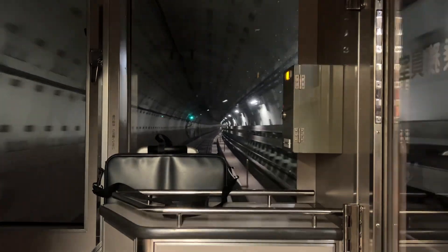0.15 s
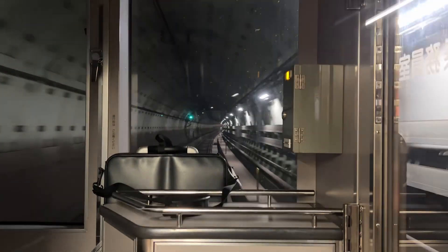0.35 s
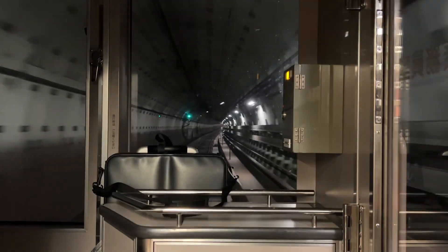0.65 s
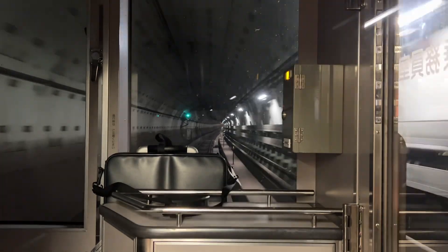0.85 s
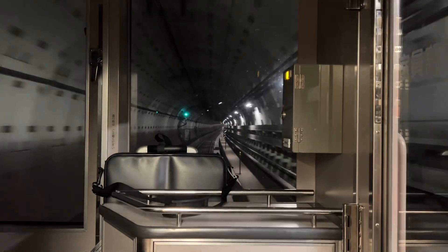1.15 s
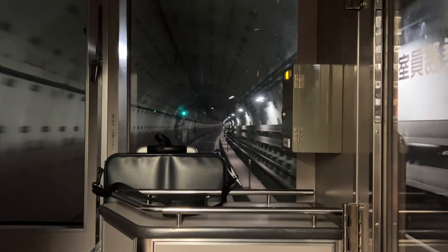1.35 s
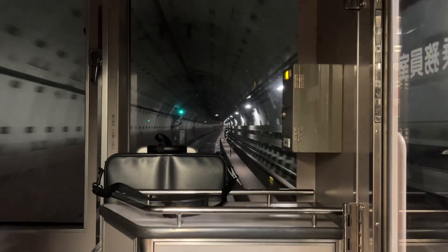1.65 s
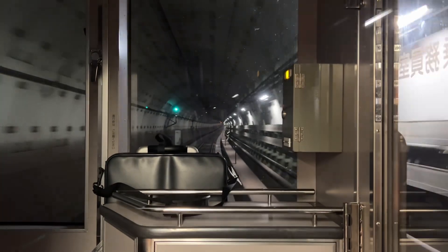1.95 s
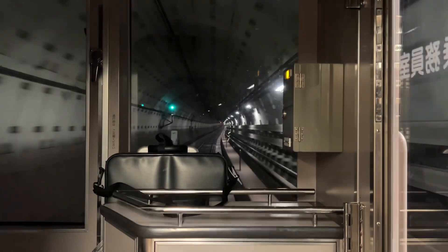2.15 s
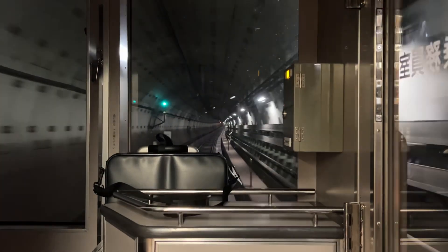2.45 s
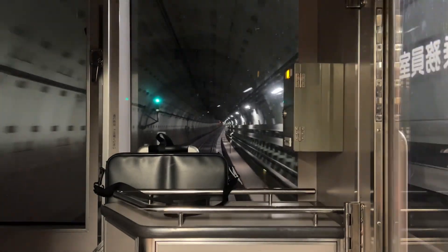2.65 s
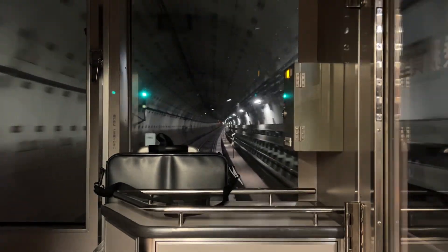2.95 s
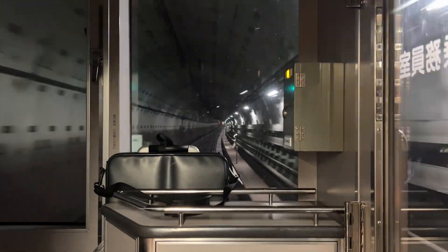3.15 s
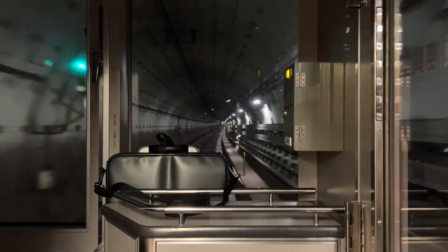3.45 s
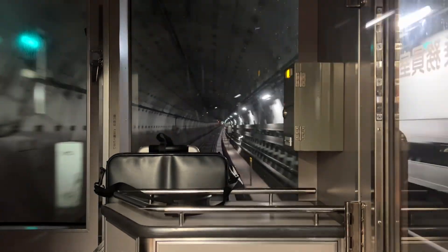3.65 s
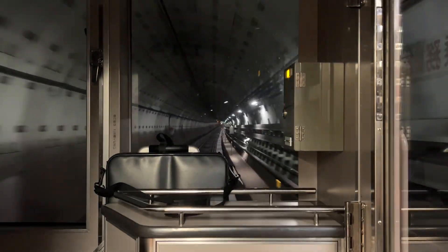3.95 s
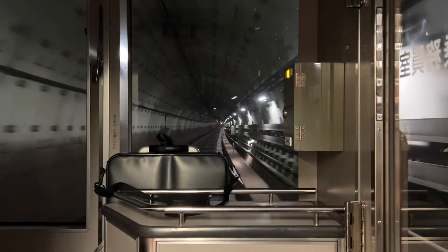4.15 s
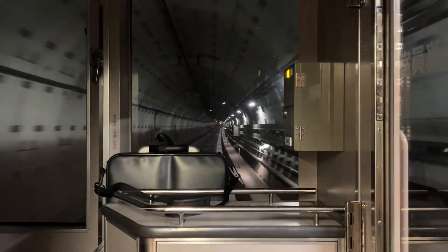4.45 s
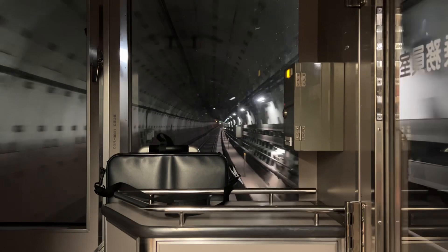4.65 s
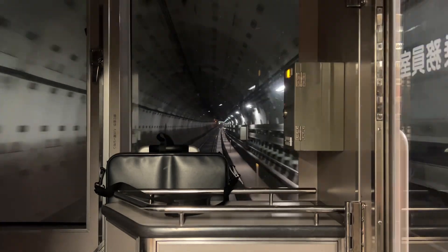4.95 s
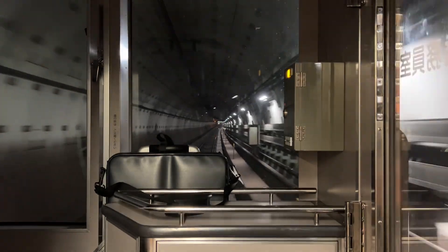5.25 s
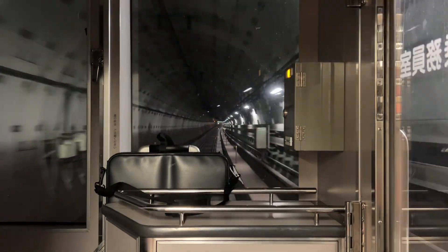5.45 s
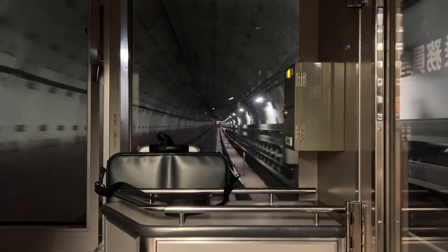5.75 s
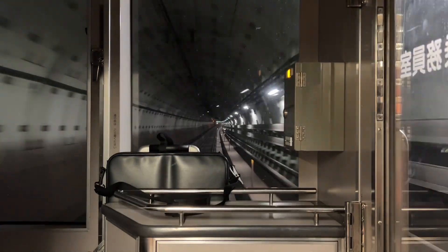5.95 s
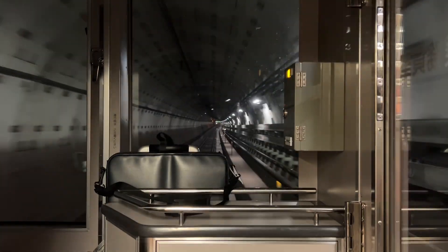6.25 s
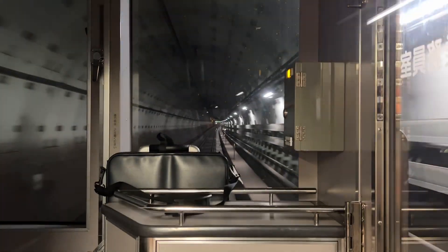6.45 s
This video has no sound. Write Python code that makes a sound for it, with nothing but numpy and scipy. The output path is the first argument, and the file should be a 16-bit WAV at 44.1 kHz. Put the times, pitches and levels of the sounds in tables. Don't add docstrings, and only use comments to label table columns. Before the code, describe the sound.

Inside the front car of an electric train moving through a tunnel, heard in stereo on a phone close to the cab partition. From 0 s there is a deep, wavering rumble, a dull wheel hum and a thin hiss of rushing air. Loose metal door fittings buzz and knock immediately, busiest until about 1.5 s, with sharp dry ticks near 0.85 and 1.37 s. The rattle then thins while the rumble surges briefly around 2.4 s. From about 2.8 s rough rail drives harder, fuller booms, with ticks near 3.3 and 3.6 s. Just after 4 s the wheels strike a rail gap, a hard clank and a second blow ringing in the steel; softer blows come around 5 to 5.1 s. Bright buzzing and knocks return strongly from 5.2 s, including a sharper knock near 5.75 s, and continue over heavy rolling until the end at about 6.6 s.

```python
import sys
import numpy as np
from scipy import signal
from scipy.fft import rfft, irfft, next_fast_len
from scipy.io import wavfile
from scipy.ndimage import uniform_filter1d, map_coordinates

SR = 44100
rng = np.random.default_rng(int(sys.argv[2]) if len(sys.argv) > 2 else 0)


def boost(x):
    u = np.asarray(x, float) / 20
    return 10 ** u


def to_wav(sig):
    pcm = np.clip(np.atleast_2d(sig), -1, 1) * 32767
    pcm = np.round(pcm).astype(np.int16)
    wavfile.write(sys.argv[1], SR, pcm.T)


N = 291501

# (frequency [Hz], level [dB])
SHAKE_TONE = [(15, -46.5), (25, -17), (40, -15), (60, -7.5), (75, -1.5), (105, -8.5), (135, -7.5),
              (200, -3.5), (400, -76)]
# (frequency [Hz], level over the shake [dB])
SPRING_HUMS = [(50, -7), (73, -3), (101, -1)]
# (start [s], length [s], boom [dB], floor over boom [dB], panels over boom [dB])
RAIL_RIPPLES = [(0.136, 0.36, -29.5, -19, -16), (0.793, 0.033, -32, -22, -18), (1.275, 0.36, -31.5, 1, -18),
                (1.625, 0.19, -25.5, -0.5, -15.5), (1.768, 0.16, -26.5, 2.5, -24),
                (1.97, .2, -30.5, -5, -23), (2.24, 0.18, -33, 1.5, -16), (2.393, 0.31, -20, -6.5, -27),
                (2.796, 0.19, -25, 0.5, -5.5), (2.95, 0.16, -18, -1, -9), (3.12, 0.48, -30, 3.5, -10),
                (3.668, 0.18, -18.5, -0.5, -10), (3.868, 0.064, -18, 1, -9.5),
                (4.062, 0.068, -14, -11, -11.5), (4.15, 0.17, -16, -6.5, -10),
                (4.35, 0.036, -21.5, -7.5, -22), (4.45, 0.63, -22, -2.5, -12),
                (4.897, 0.11, -13.5, -3.5, -10), (5.016, 0.18, -15, -1.5, -8), (5.288, 0.19, -19.5, -6, -7),
                (5.51, 0.3, -20, -7.5, -9.5), (5.761, 0.3, -16, -6.5, -11), (6.124, 0.19, -16, -6, -16.5),
                (6.395, 0.15, -20, -8, -11)]
# (frequency [Hz], width [Hz], level [dB])
BODY_MODES = [(158.6, 55, -5.5), (204.9, 33.4, 1), (236.7, 12.8, 3)]
# (frequency [Hz], width [Hz], level [dB])
FLOOR_MODES = [(281.4, 50, -0.5), (331, 44, -4), (365, 57, -8)]
# (frequency [Hz], width [Hz], level [dB])
PANEL_MODES = [(453, 126, 1.5), (552, 48, -2), (608, 70, -2), (694, 104, 0)]
# (frequency [Hz], width [Hz], level [dB])
WHEEL_MODES = [(862, 163, 5), (1020, 360, 1), (1365, 315, 1), (1900, 480, -2.5), (2390, 870, -7.5),
               (3010, 540, -13.5)]
# (time [s], level [dB])
WHEEL_SONG = [(0, -35.5), (2.5, -37.5), (6.61, -37.5)]
# (time [s], level [dB], time to fade by 60 dB [s])
RAIL_GAPS = [
    (4.068, -16.5, 0.93),
    (4.092, -32, 0.37),
    (4.2, -23, 1),
    (4.233, -35.5, 0.17),
    (4.932, -42.5, 0.82),
    (4.99, -31.5, 0.99),
    (5.101, -26.5, 0.56),
]
# (frequency [Hz], width [Hz], level [dB])
WHEEL_RING_MODES = [(775, 56, 8), (913, 190, 1), (1350, 110, 0), (1940, 200, -3), (2370, 340, -16),
                    (2860, 430, -16.5), (3830, 250, -24.5), (5530, 860, -31)]
# (frequency [Hz], level [dB])
AIR_TONE = [(2000, -29), (3300, 4.5), (4500, 1), (7000, -6), (10000, -50), (15300, -18.5), (15900, -32.5)]
# (start [s], length [s], level [dB], top end [dB])
BUZZ_SPELLS = [(0.027, 0.2, -47.5, -4), (0.326, 0.066, -50, -3), (0.459, 0.1, -45.5, -5.5),
               (0.613, .05, -52, -2), (0.83, 0.053, -53.5, -3), (0.951, .08, -52, -3),
               (1.116, 0.037, -54, -10), (1.22, 0.13, -55, -4), (1.505, 0.4, -66, -5),
               (1.835, .32, -55, -4.5), (2.213, 0.4, -52.5, -13), (2.826, 0.32, -50.5, -6.5),
               (3.12, 0.34, -48, -5.5), (3.563, 0.22, -58.5, -2), (3.779, .24, -48.5, -7),
               (4.047, 0.16, -53, -15), (4.627, 0.62, -47, -8), (5.153, 0.088, -48.5, 1),
               (5.28, 0.066, -46.5, -2.5), (5.387, 0.18, -44.5, -1), (5.542, 0.19, -43.5, -4),
               (5.86, 0.15, -52, -9), (6.002, 0.087, -48.5, -5), (6.11, 0.25, -48, -1.5),
               (6.401, 0.13, -47.5, -3.5)]
# (time [s], peak [dB], top end [dB])
KNOCKS = [(0.037, -36, -15), (0.0894, -29.5, -11), (0.149, -22, -11), (0.2423, -35, -4),
          (0.3202, -31.5, -8), (0.341, -28.5, -6), (0.411, -31, -5.5), (0.4654, -33, -4),
          (0.5045, -32.5, -9), (0.6394, -45, 4), (0.7787, -40, 0), (0.8436, -37, -12), (0.986, -35.5, -8.5),
          (1.1358, -33.5, -21), (1.2304, -37, -9), (1.259, -21, -13), (1.29, -42, -9), (1.3774, -35, -4),
          (2.944, -32.5, -4), (3.0437, -33.5, -5), (4.6628, -51, -9), (5.1704, -32.5, -3),
          (5.2994, -36.5, -4), (5.4476, -52, -1.5), (5.6, -43.5, -12), (5.7424, -26.5, -8.5),
          (6.0038, -35, -4), (6.1404, -37, -3), (6.4098, -31, -2.5), (6.4694, -34.5, -5)]
# (frequency [Hz], width [Hz], level [dB])
METAL_MODES = [(4330, 760, 2.5), (5570, 420, 2), (6640, 640, 1), (8240, 1100, -1.5), (9500, 2100, -17)]
# (frequency [Hz], level [dB])
SIZZLE_TONE = [(7000, -59.5), (9500, -22), (11000, -4.5), (12300, 0.5), (13500, -12), (14600, -1),
               (15300, -11.5), (15700, -38.5)]
# (time [s], peak [dB], centre [Hz], time to fade by 60 dB [s], thump [dB])
DRY_TICKS = [(0.5067, -39.5, 11950, 0.0023, -6), (0.846, -26.5, 7230, 0.0025, -7),
             (0.846, -36, 12450, 0.0018, -20), (0.846, -30, 4300, .003, -20),
             (1.3705, -29, 4500, .003, -25), (1.37, -23.5, 7570, 0.0018, -8), (1.37, -28, 13100, .002, -11),
             (1.3713, -25, 2480, 0.01, 9), (3.285, -19.5, 2670, 0.0056, 0.5),
             (3.2847, -35, 4250, 0.0034, -20), (3.612, -39, 9100, .002, 9), (5.867, -27, 1530, 0.0082, 8)]
# (frequency [Hz], level [dB])
CASE_SHADE = [(2600, -0.5), (3150, -3.5), (3600, -3.5), (4300, -4), (5200, -0.5)]
# (frequency [Hz], likeness [0-1])
PORT_LIKENESS = [(60, .995), (170, .93), (260, .78), (350, .55), (550, .5), (800, .12), (1700, .12),
                 (2100, .93), (2600, .92), (3700, .25), (4500, .6), (5200, .5), (6300, .85), (9000, .9),
                 (11500, .9), (16000, .82)]
# (frequency [Hz], phase [radians])
PORT_LEAD = [(100, 0), (450, -.5), (700, 0), (1900, .2), (2500, .3), (3700, 1.2), (5000, .2), (5700, -.5),
             (6500, 0), (8000, -.8), (10050, -3.14), (13300, -6.28), (16000, -8.2)]
# (frequency [Hz], level difference [dB])
PORT_LEAN = [(100, 0), (330, -1.5), (520, 4.5), (700, -3.5), (950, 0), (1350, -2.5), (2300, 2), (3500, 2),
             (4800, 4), (6300, 0.5)]

LONG_RISE = 0.12
SWAY_DB, SWAY_UNDER_BOOM_DB = -29, -20
RIPPLE_RISE_S, RIPPLE_T60_S = 0.029, 1
SMOOTH_BOOM_DB, SMOOTH_FLOOR_DB, SMOOTH_DRUM_DB = -31.5, -35, -33.5
SING_UNDER_DRUM_DB, SING_GROWS, HARD_DRUM_DB = -9.5, 1.75, -21.5
BUZZ_RISE_S, BUZZ_T60_S, IDLE_DB, IDLE_TOP_DB = 0.018, 0.58, -61, -6
KNOCK_T60_S, KNOCK_LONGER = 0.13, 0.0044


def unit(x):
    return x / np.sqrt(np.mean(x ** 2) + 1e-20)


def along(points, hz):
    f, v = np.transpose(points)
    return np.interp(np.log(hz + 1), np.log(f + 1), v)


def curves(rows):
    s, *cols = np.transpose(rows)
    return [np.interp(np.arange(N) / SR, s, c) for c in cols]


def filtered(x, response):
    m = next_fast_len(N + 8192)
    spectrum = rfft(x, m) * response(np.fft.rfftfreq(m, 1 / SR))
    return irfft(spectrum, m)[..., :N]


def modes(rows, steep):
    def response(f):
        power = 0
        for centre, width, db in rows:
            across = (f * width) ** 2
            power = power + boost(2 * db) * (across / ((centre * centre - f * f) ** 2 + across)) ** steep
        return np.sqrt(power)
    return response


def colour(points):
    return lambda hz: boost(along(points, hz))


def shaking(response, patchy_db=None):
    noise = rng.standard_normal((2, N))
    if patchy_db:
        z = signal.stft(noise, nperseg=512)[2]
        field = uniform_filter1d(rng.standard_normal(z.shape[1:]), size=5, axis=0)
        field = uniform_filter1d(field, size=10, axis=1)
        noise = signal.istft(z * boost(patchy_db * unit(field)), nperseg=512)[1][:, :N]
    return unit(filtered(noise, response))


def spells(starts, lengths, levels_db, rest_db, rise_s, t60):
    t = np.arange(0, N + 64, 64) / SR
    power = boost(2 * rest_db) + 0 * t
    for s, length, db in zip(starts, lengths, levels_db):
        rise = np.clip((t - s) / (rise_s + LONG_RISE * length), 0, 1)
        fade_db = 60 * np.clip(t - s - length, 0, None) / t60
        power += boost(2 * (db - fade_db)) * rise ** 2
    return np.interp(np.arange(N) / SR, t, 10 * np.log10(power))


def bursts(times, levels_db, decays, rise):
    out, t = np.zeros(N + SR), np.arange(SR // 2) / SR
    for s, db, t60 in zip(times, levels_db, decays):
        out[round(s * SR):][:len(t)] += boost(db - 60 * t / max(t60, .01)) * (1 - np.exp(-t / rise))
    return out[:N]


def rolling(over_db, rest_db):
    s, length, db = np.transpose(RAIL_RIPPLES)[:3]
    return spells(s, length, db + over_db, rest_db, RIPPLE_RISE_S, RIPPLE_T60_S)


def bogie():
    hums = 0
    for hz, db in SPRING_HUMS:
        wander = map_coordinates(rng.standard_normal(200), [np.arange(N) * 14 / SR])
        hums = hums + boost(db) * np.sin(2 * np.pi * np.cumsum(hz * (1 + .09 * wander)) / SR)
    shake = shaking(colour(SHAKE_TONE)) * boost(1.5)
    return boost(rolling(SWAY_UNDER_BOOM_DB, SWAY_DB) + 1.0) * (shake + [hums, 0 * hums])


def wheels():
    *_, floor_over_db, drum_over_db = np.transpose(RAIL_RIPPLES)
    boom_db = rolling(0, SMOOTH_BOOM_DB)
    floor_db = rolling(floor_over_db, SMOOTH_FLOOR_DB)
    drum_db = rolling(drum_over_db, SMOOTH_DRUM_DB)
    woken_db = HARD_DRUM_DB + SING_UNDER_DRUM_DB + SING_GROWS * (drum_db - HARD_DRUM_DB)
    boom = boost(boom_db) * shaking(modes(BODY_MODES, steep=1.77), patchy_db=1.0)
    floor = boost(floor_db) * shaking(modes(FLOOR_MODES, steep=1.85))
    drum = boost(drum_db + 0.96) * shaking(modes(PANEL_MODES, steep=1.88), patchy_db=2.1)
    song = np.hypot(boost(curves(WHEEL_SONG)[0] + 4.0), boost(woken_db + 2.5))
    ring = song * shaking(modes(WHEEL_MODES, steep=1.72), patchy_db=0.88)
    blows = bursts(*np.transpose(RAIL_GAPS), rise=0.0061)
    gaps = blows * shaking(modes(WHEEL_RING_MODES, steep=1.55), patchy_db=1.5)
    return boom + floor + drum + ring + gaps


def air_rush():
    return boost(-59.5) * shaking(colour(AIR_TONE))


def fittings():
    start, length, level_db, top_db = np.transpose(BUZZ_SPELLS)
    buzz_db = spells(start, length, level_db, IDLE_DB, BUZZ_RISE_S, BUZZ_T60_S)
    sizzle_db = spells(start, length, level_db + top_db, IDLE_DB + IDLE_TOP_DB, BUZZ_RISE_S, BUZZ_T60_S)
    s, db, knock_top_db = np.transpose(KNOCKS)
    t60 = KNOCK_T60_S + KNOCK_LONGER * (db - db.mean())
    low = boost(buzz_db) + bursts(s, db - 13.5, t60, rise=0.0015)
    high = boost(sizzle_db - 4.0) + bursts(s, db - 9.0 + knock_top_db, 0.82 * t60, rise=.006)
    clumps = unit(boost(0.8 * unit(uniform_filter1d(rng.standard_normal(N), size=160))))
    metal = low * shaking(modes(METAL_MODES, steep=1.11), patchy_db=1.5)
    sizzle = high * shaking(colour(SIZZLE_TONE), patchy_db=-1.0)
    return clumps * (metal + sizzle)


def ticks():
    out, t = np.zeros((2, N + SR)), np.arange(SR // 20) / SR
    for s, db, hz, t60, thump_db in DRY_TICKS:
        grit = uniform_filter1d(rng.standard_normal((2, len(t))), size=3) * hz / 9000
        envelope = boost(-60 * t / t60) * (1 - np.exp(-3 * t * hz))
        crack = (0.82 + grit) * np.sin(2 * np.pi * hz * t) * envelope
        thump = boost(thump_db - 60 * t / 0.033) * np.sin(2 * np.pi * 420 * t)
        out[:, round(s * SR):][:, :len(t)] += boost(db + 2.5) * (crack + thump)
    return out[:, :N]


def scene():
    return bogie() + wheels() + air_rush() + fittings() + ticks()


def roll_off(x):
    return signal.sosfilt(signal.butter(12, 15710, fs=SR, output="sos"), x)


def record(dry):
    def share(hz):
        turn = np.arccos(np.clip(along(PORT_LIKENESS, hz), 0, 1)) / 2
        return colour(CASE_SHADE)(hz) * np.array([np.cos(turn), np.sin(turn)])

    def lead_and_lean(hz):
        half = boost(along(PORT_LEAN, hz) / 2) * np.exp(.5j * np.interp(hz, *np.transpose(PORT_LEAD)))
        return np.array([half, 1 / half])

    shared, apart = filtered(dry, share)
    ports = filtered(np.array([shared + apart, shared - apart]), lead_and_lean)
    ports = ports / (1 + abs(ports / .98) ** 6) ** (1 / 6)
    return roll_off(ports)


dry = scene()
out = record(dry)
to_wav(out)
```